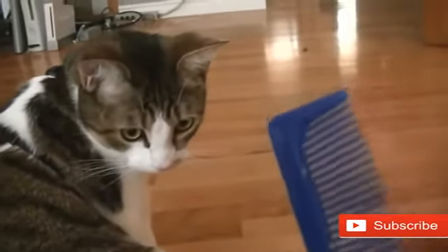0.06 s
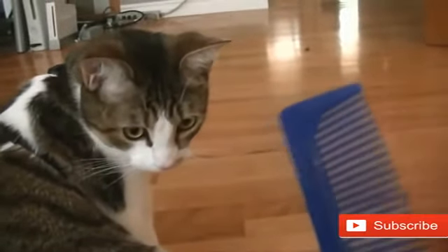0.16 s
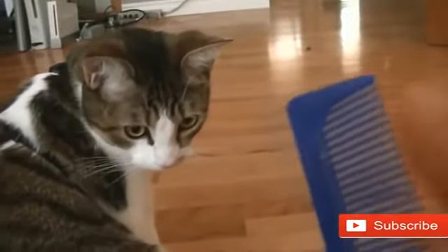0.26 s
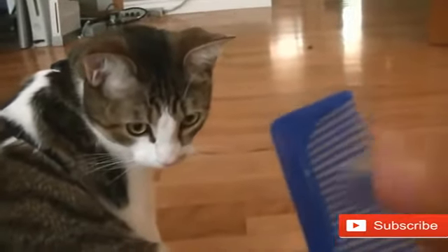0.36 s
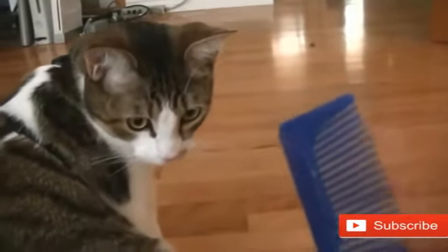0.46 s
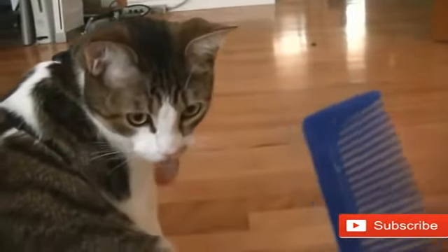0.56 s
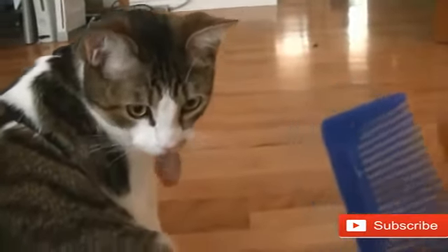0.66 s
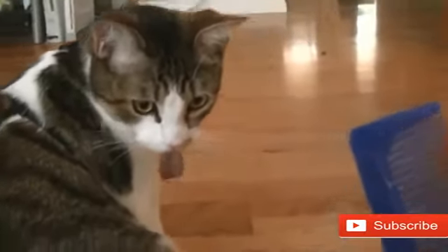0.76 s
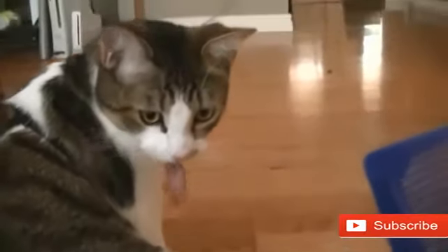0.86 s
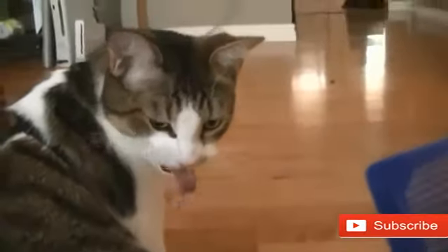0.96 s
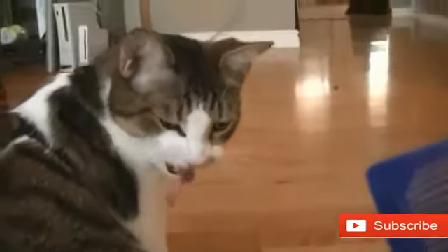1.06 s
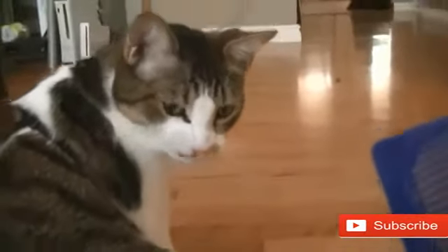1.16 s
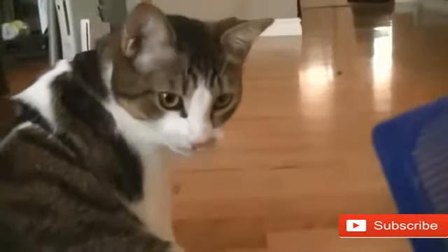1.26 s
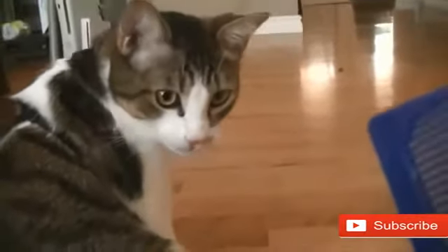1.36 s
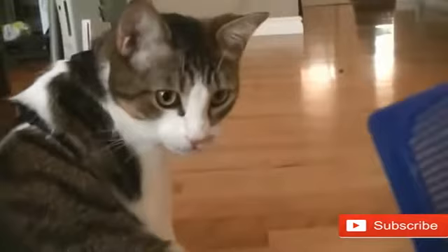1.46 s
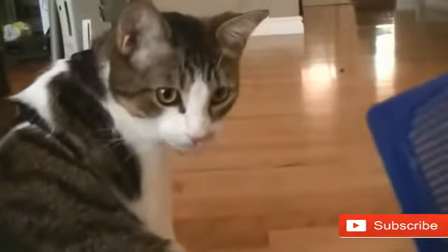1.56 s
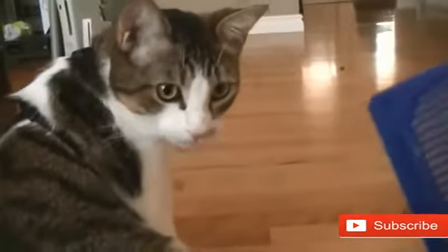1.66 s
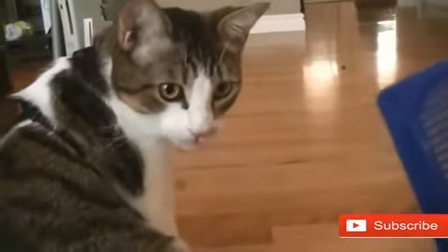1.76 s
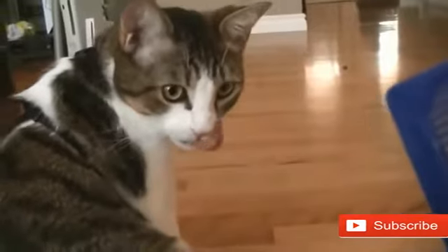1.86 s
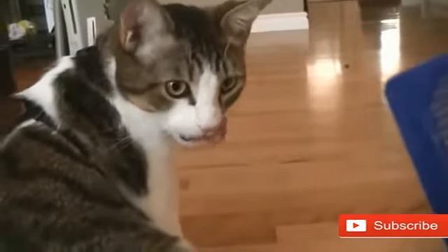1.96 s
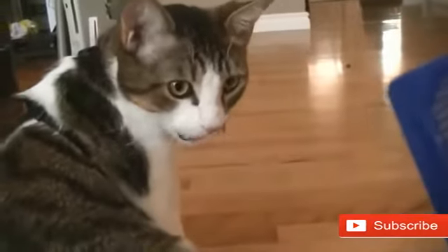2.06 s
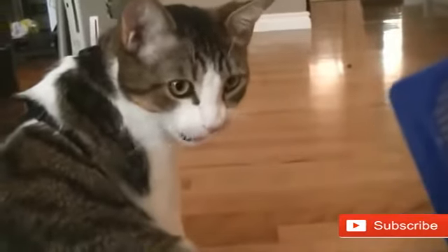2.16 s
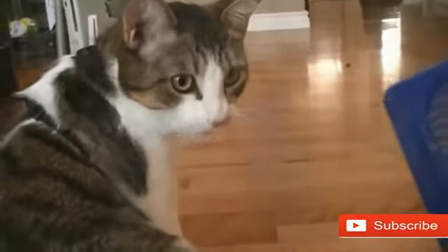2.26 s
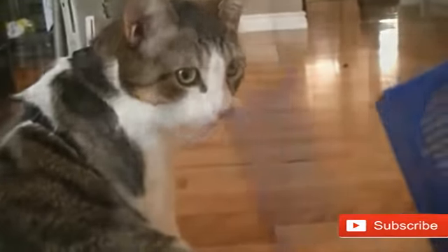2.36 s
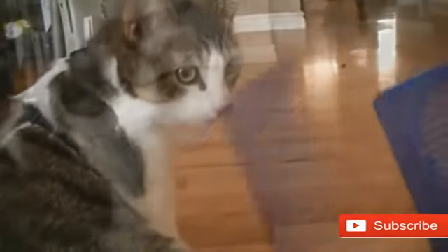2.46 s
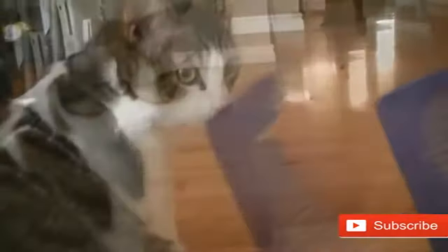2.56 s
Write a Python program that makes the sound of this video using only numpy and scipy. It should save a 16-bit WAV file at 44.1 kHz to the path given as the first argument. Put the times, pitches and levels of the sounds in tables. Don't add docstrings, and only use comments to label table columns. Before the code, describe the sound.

Close plastic comb teeth snap in a fast clicking rasp, pause, and rasp again slightly louder; faint ticks and a tiny wet lick follow over soft indoor hiss, before a dull, quiet zip ends it.

```python
import sys
import numpy as np
from scipy import signal
from scipy.io import wavfile
from scipy.ndimage import uniform_filter1d

SR = 44100
rng = np.random.default_rng(int(sys.argv[2]) if len(sys.argv) > 2 else 0)


def volts_from_decibels(level):
    exponent = np.asarray(level, float) / 20
    return 10 ** exponent


def file_out(sig):
    cols = np.atleast_2d(sig).T
    lim = np.clip(cols, -1, 1)
    pcm = np.round(lim * 32767).astype(np.int16)
    wavfile.write(sys.argv[1], SR, pcm)


N = 114660

# f/Hz, level per Hz/dB
AIR_COLOUR = [(15, -44), (25, -20.5), (141, -11.5), (236, -1.5), (326, -8.5), (607, -3.5), (754, -7.5),
              (8590, -17.5), (16000, -24)]
# f/Hz, likeness [0 to 1]
AIR_LIKENESS = [(30, .3), (60, 0.29), (125, 0.92), (500, 1), (2000, 1), (5000, 1), (9000, 0.81),
                (15000, 0.2)]
# f/Hz, width/Hz, level/dB
HUM_TONES = [(235.2, 22, -71.5), (598, 43, -78), (2331, 210, -71.5)]
# t/s, level/dB
LICK_LEVEL = [
    (1.25, -75),
    (1.292, -62.5),
    (1.412, -51.5),
    (1.428, -77),
    (1.438, -57),
    (1.47, -77),
]
# t/s, share of the resonance pitch
LICK_GLIDE_CURVE = [(1.335, .8), (1.37, .99), (1.42, 1.01)]
# f/Hz, width/Hz, level/dB
MOUTH_RESONANCES = [(2400, 450, -3), (4450, 550, 1), (9000, 400, -4), (4500, 8000, 1)]
# t/s, peak level/dB, centre f/Hz, width/Hz, length/s
SMALL_TICKS = [(.188, -39, 1190, 396, 0.0022), (0.189, -38.5, 3000, 5030, .001),
               (0.449, -32, 4900, 4000, .002), (0.455, -19, 5200, 4500, 0.00096),
               (0.502, -41.5, 2980, 2840, 0.0015), (.598, -44, 2190, 2000, 0.0018),
               (.843, -24, 5760, 6950, 0.00077), (1.315, -44, 4600, 2500, 0.0007),
               (1.594, -38.5, 2220, 2000, 0.0055), (1.597, -50, 8300, 2500, 0.005),
               (1.817, -42, 8040, 1800, .002), (1.982, -42, 2750, 3500, 0.00092),
               (2.01, -48, 2800, 3000, 0.0013), (2.189, -44.5, 4360, 900, 0.0018)]
# t/s, crack level/dB, upper note f/Hz, low note level/dB, upper note level/dB
FIRST_ZIP = [(0.2373, -26, 2720, -30, -27), (0.2621, -29, 2460, -29, -31), (0.2818, -27, 2490, -30, -39),
             (0.296, -26, 2280, -30, -35), (0.3069, -26, 2330, -32, -26), (0.316, -24, 2530, -35, -33),
             (0.3235, -25, 2250, -34, -26), (0.3312, -24, 2250, -34, -25), (0.3394, -25, 2140, -35, -24),
             (0.3479, -23, 2180, -34, -25), (0.3565, -23, 2120, -36, -25), (0.3658, -25, 2140, -37, -26),
             (0.3779, -24, 2370, -40, -24), (0.3963, -33, 2250, -41, -26)]
SECOND_ZIP = [(0.6248, -30, 2070, -37, -38), (0.6443, -27, 2070, -32, -39), (0.6613, -24, 2230, -31, -34),
              (0.6759, -24, 2670, -31, -41), (0.6892, -23, 2160, -31, -31), (0.7001, -21, 2260, -32, -32),
              (0.7107, -20, 2250, -31, -31), (0.7209, -19, 2150, -35, -29), (0.7308, -20, 2060, -33, -28),
              (0.7414, -21, 2050, -34, -26), (0.7532, -22, 1980, -33, -25), (0.7666, -25, 1960, -35, -26),
              (0.7915, -29, 1960, -37, -27)]
FAINT_ZIP = [(2.4643, -39, 2160, -51, -54), (2.4882, -37, 2050, -50, -51), (2.504, -37, 2110, -50, -50),
             (2.5198, -36, 1950, -50, -47), (2.5381, -36, 1930, -48, -47), (2.5617, -36, 1840, -50, -47)]
# low note of first tooth f/Hz, of last tooth f/Hz, skin hiss level/dB,
# crack pitch share, drag after the last tooth t/s, drag level/dB
ZIP_STROKES = [
    (1094, 1017, -34, 1.037, 0.09, -54),
    (1078, 1000, -36, 0.999, 0.067, -49.5),
    (1070, 890, -53, 0.756, 0.0088, -70),
]
# f/Hz, level/dB, time to fall 60 dB t/s
CRACK_NOTES = [(3200, -5, .004), (5150, 0, .0035), (5900, -2, .003), (6800, 0, .0035), (7900, -4, .003),
               (10800, -7, .003), (13300, -10, .003), (14600, -5, .003)]
# f/Hz, level per Hz/dB
SKIN_COLOUR = [(150, -24.5), (300, -14.5), (2100, -12), (4100, -11.5), (6000, -11.5), (9300, -14.5),
               (12500, -14), (15000, -16.5)]
# f/Hz, likeness [0 to 1]
ZIP_HISS_LIKENESS = [(1000, 0.9), (3000, 1), (6000, 0.21), (14000, 0.067)]

AIR_DB = -58
ROOM_DB, ROOM_T60_S = -24, 0.12
TICK_TAIL_DB, TICK_TAIL_S, TICK_LEAD_S = -20, 0.013, 0.0032
LOW_DB, UPPER_DB, RING_LOW_S, RING_UPPER_S, BEND_RISE_S = 3.5, 1.5, 0.019, 0.014, 0.0007
TWIN_RATIO, TWIN_DB = 1.165, 3
GRIP = 1.5
CRACK_DB, BRIGHT_SPREAD_DB, BRIGHT_DETUNE, SNAP_S = 2, 2, 0.03, 0.0002
REBOUND_S, REBOUND = 0.0006, 0.7
DULL_DB_PER_KHZ = 2.5
SKIN_LEAD_S, SKIN_EDGE_DB = 0.011, -13
CREEP_S, CREEP_DB = 0.0016, -14
MIC_LOW_HZ, EDGE_HZ, CEILING = 170, 15750, 0.3


def evened(x):
    return x / np.sqrt(np.mean(x ** 2) + 1e-20)


def read(points, hz):
    f, value = np.transpose(points)
    return np.interp(np.log(hz + 1), np.log(f + 1), value)


def add(mix, s, sound):
    part = mix[round(s * SR):][:len(sound)]
    part += sound[:len(part)]


def resonate(x, hz, width):
    turn = np.exp(2j * np.pi * np.cumsum(hz * np.ones(len(x))) / SR)
    r = np.exp(-np.pi * width / SR)
    return 2 * (turn * signal.lfilter([1 - r], [1, -r], x / turn + 1e-18)).real


def resonate_twice(x, hz, width):
    return resonate(resonate(x, hz, width), hz, width)


def hiss(colour, likeness, patchy_db, wander_db):
    frames, hz = N // 256 + 5, np.fft.rfftfreq(1024, 1 / SR)
    a, b, c, d, *patches = rng.standard_normal((frames, 513, 6)).T
    level, width = (evened(uniform_filter1d(uniform_filter1d(p, 12, 0), 10, 1)) for p in patches)
    unlike = 1 - read(likeness, hz)[:, None]
    same = np.clip(1 - unlike * volts_from_decibels(wander_db * width), 0, 1)
    middle = (a + 1j * b) * np.sqrt(1 + same)
    edge = (c + 1j * d) * np.sqrt(1 - same)
    loudness = volts_from_decibels(read(colour, hz)[:, None] + patchy_db * level)
    z = np.array([middle + edge, middle - edge]) * loudness
    return evened(signal.istft(z, nperseg=1024, noverlap=768)[1][:, :N])


def air():
    hum = np.zeros(N)
    for hz, width, db in HUM_TONES:
        tone = resonate_twice(rng.standard_normal(N), hz, width)
        hum += volts_from_decibels(db) * evened(tone)
    return volts_from_decibels(AIR_DB) * hiss(AIR_COLOUR, AIR_LIKENESS, patchy_db=1.5, wander_db=7.5) + hum


def room(x):
    taps = np.zeros((2, 8820))
    at = np.arange(100, 8800, 20) + rng.integers(0, 20, (2, 435))
    np.put_along_axis(taps, at, rng.choice([-1., 1.], at.shape), 1)
    taps = taps * volts_from_decibels(-60 * np.arange(8820) / SR / ROOM_T60_S)
    return signal.fftconvolve(x[None], taps / np.linalg.norm(taps[0]), axes=1)[:, :N]


def lick():
    t, noise = np.arange(N) / SR, rng.standard_normal(N)
    glide = np.interp(t, *np.transpose(LICK_GLIDE_CURVE))
    wet = np.zeros(N)
    for hz, width, db in MOUTH_RESONANCES:
        wet += volts_from_decibels(db) * resonate_twice(noise, hz * glide, width) * np.sqrt(400 / width)
    level_db = np.interp(t, *np.transpose(LICK_LEVEL), left=-120, right=-120)
    return evened(wet) * volts_from_decibels(level_db)


def ticks():
    out, t = np.zeros(N), np.arange(-600, 1500) / SR
    for s, db, hz, width, length in SMALL_TICKS:
        noise = rng.standard_normal(len(t))
        burst = noise * (t >= 0) * np.exp(-abs(t) / length)
        puff = resonate_twice(burst, hz, width)
        swell = np.exp(-abs(t) / np.where(t < 0, TICK_LEAD_S, TICK_TAIL_S))
        scrape = evened(resonate_twice(noise, hz, width)) * swell
        add(out, s + t[0], volts_from_decibels(db) * (puff / abs(puff).max() + volts_from_decibels(TICK_TAIL_DB) / 2 * scrape))
    return out


def tooth(low_hz, share, crack_db, upper_hz, low_db, upper_db):
    size = 2048
    t = np.arange(size) / SR
    luck = rng.standard_normal((len(CRACK_NOTES) + 2, 3))

    def ring(hz, db, t60, turn):
        return volts_from_decibels(db - 60 * (t / t60) ** GRIP) * np.sin(2 * np.pi * hz * t + turn)

    upper_db = upper_db + UPPER_DB
    twin_hz = upper_hz * TWIN_RATIO ** np.tanh(2 * luck[0, 0])
    bend = ring(low_hz, low_db + LOW_DB, RING_LOW_S, 0)
    bend = bend + ring(upper_hz, upper_db, RING_UPPER_S, 0)
    bend = bend + ring(twin_hz, upper_db + TWIN_DB, RING_UPPER_S / 2, 2 * luck[0, 1])

    crack = np.zeros(size)
    for (hz, db, t60), (u, v, w) in zip(CRACK_NOTES, luck[2:]):
        note_hz = hz * share * (1 + BRIGHT_DETUNE * u)
        dulling_db = DULL_DB_PER_KHZ * (1 - share) * hz / 1e3
        crack += ring(note_hz, db + BRIGHT_SPREAD_DB * v - dulling_db, t60, w / 2)
    late = round(SR * REBOUND_S * (1 + 0.2 * np.tanh(luck[1, 0])))
    crack = crack + REBOUND * np.pad(crack, (late, 0))[:size]
    crack = crack / np.sqrt(2 * np.mean(crack[t < 2 * REBOUND_S] ** 2))

    rising_bend = np.minimum(t / BEND_RISE_S, 1) * bend
    return np.minimum(t / SNAP_S, 1) * (rising_bend + volts_from_decibels(crack_db + CRACK_DB) * crack)


def comb():
    teeth, creep, skin_db = np.zeros(N), np.zeros(N), np.full(N, -120.)
    t, lead = np.arange(N) / SR, np.arange(-440, 440) / SR
    for rows, stroke in zip((FIRST_ZIP, SECOND_ZIP, FAINT_ZIP), ZIP_STROKES):
        first_hz, last_hz, hiss_db, share, drag_s, drag_db = stroke
        for low_hz, (s, *strike) in zip(np.linspace(first_hz, last_hz, len(rows)), rows):
            add(teeth, s, tooth(low_hz, share, *strike))
            add(creep, s + lead[0], volts_from_decibels(strike[0] + CREEP_DB) * np.exp(-abs(lead) / CREEP_S))
        at = np.array([row[0] for row in rows])
        gaps = np.diff(at)
        speed = gaps.min() / gaps
        skin_db[(t > at[-1]) & (t < at[-1] + drag_s)] = drag_db
        on = (t > at[0] - SKIN_LEAD_S) & (t < at[-1] + SKIN_LEAD_S / 2)
        speed_now = np.interp(t[on], (at[1:] + at[:-1]) / 2, speed)
        skin_db[on] = hiss_db + SKIN_EDGE_DB * (1 - speed_now)
    skin = hiss(SKIN_COLOUR, ZIP_HISS_LIKENESS, patchy_db=3.5, wander_db=5.5)
    return teeth + creep * skin.mean(0), uniform_filter1d(volts_from_decibels(skin_db), 300) * skin


def scene():
    teeth, skin = comb()
    near = teeth + ticks() + lick()
    close = near + volts_from_decibels(ROOM_DB) * room(near) + skin
    low_cut = signal.butter(4, MIC_LOW_HZ, "high", fs=SR, output="sos")
    return signal.sosfilt(low_cut, close) + air()


def roll_off(x):
    return signal.sosfilt(signal.butter(12, 16530, fs=SR, output="sos"), x)


def record(dry):
    edge = signal.firwin(511, EDGE_HZ, window=("kaiser", 8), fs=SR)[None]
    squashed = CEILING * np.tanh(dry / CEILING)
    mix = signal.oaconvolve(squashed, edge, "same")
    return roll_off(mix)


dry = scene()
out = record(dry)
file_out(out)
```